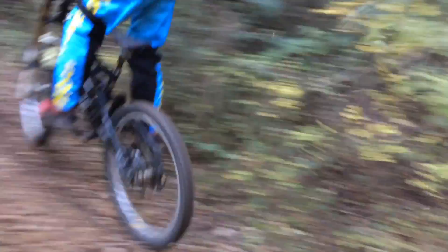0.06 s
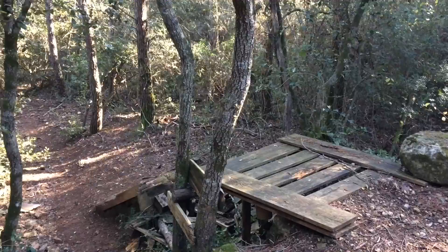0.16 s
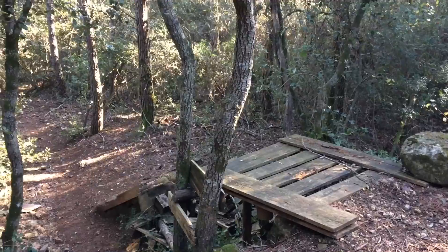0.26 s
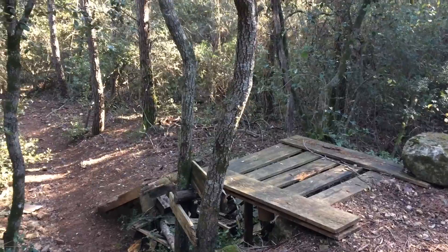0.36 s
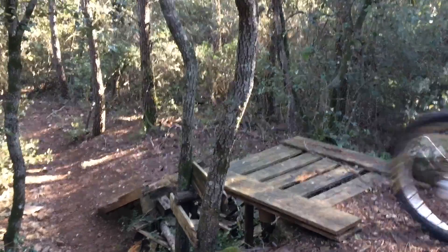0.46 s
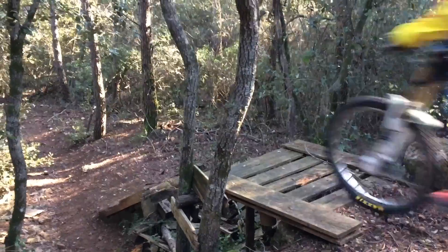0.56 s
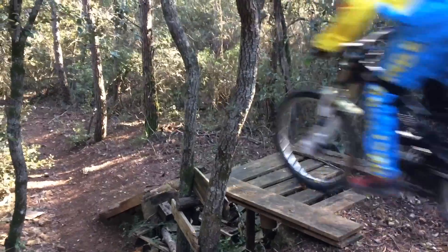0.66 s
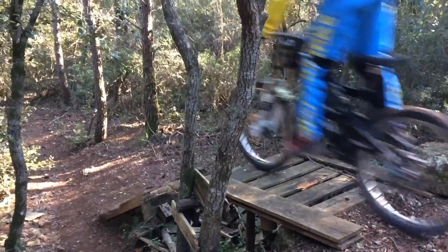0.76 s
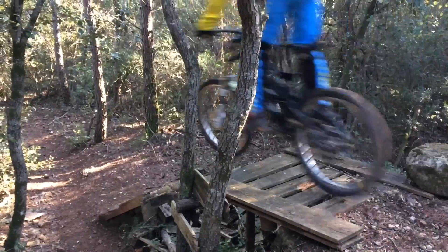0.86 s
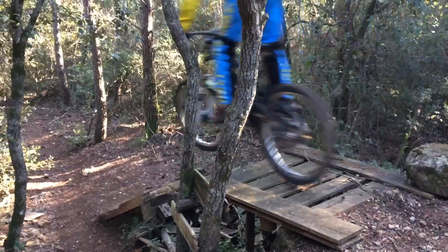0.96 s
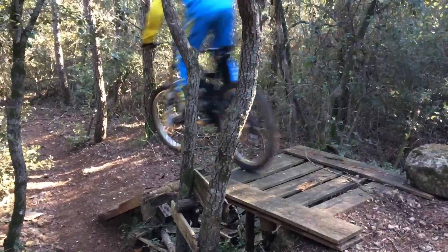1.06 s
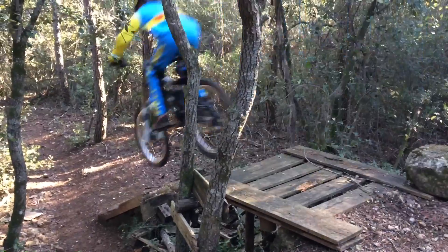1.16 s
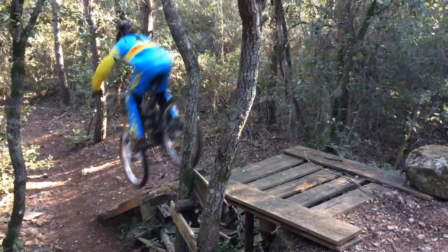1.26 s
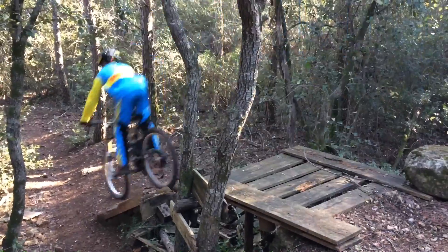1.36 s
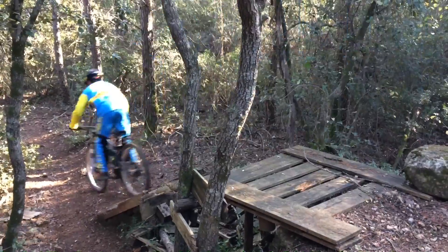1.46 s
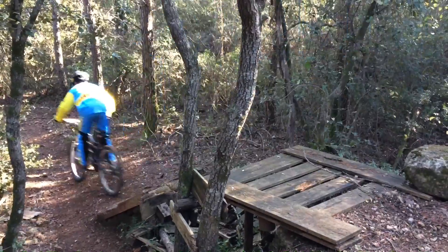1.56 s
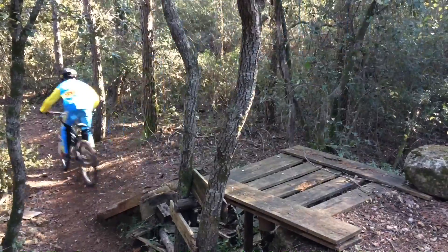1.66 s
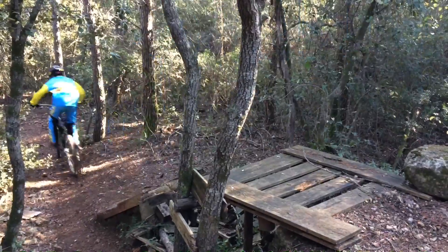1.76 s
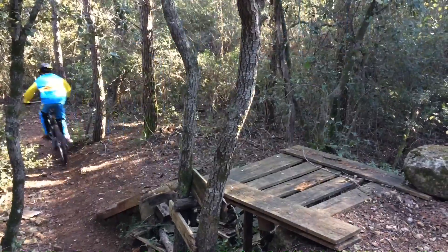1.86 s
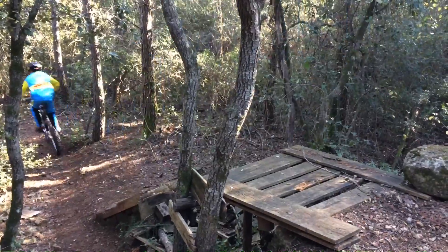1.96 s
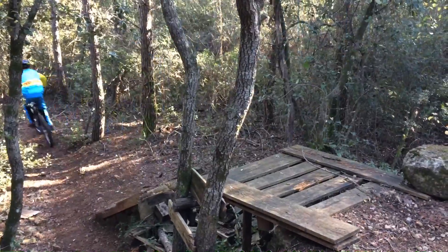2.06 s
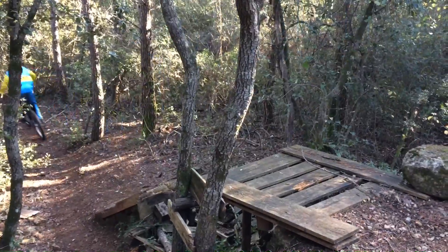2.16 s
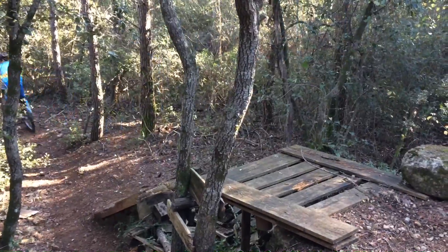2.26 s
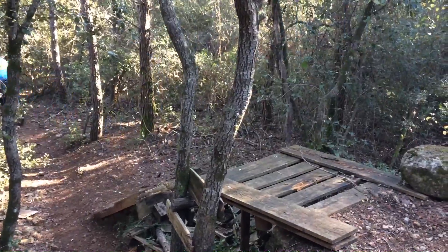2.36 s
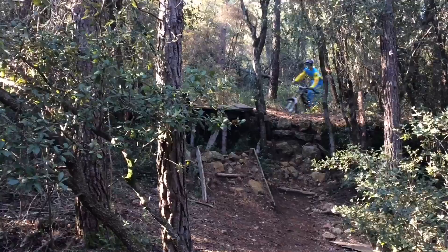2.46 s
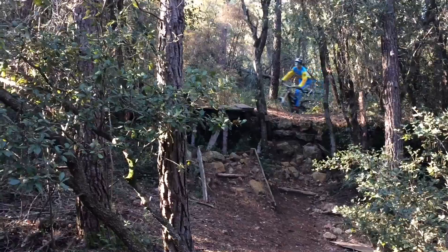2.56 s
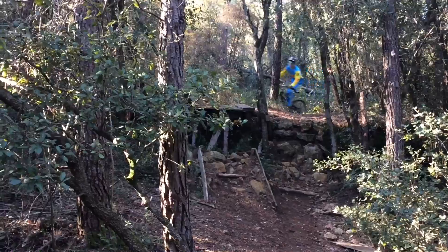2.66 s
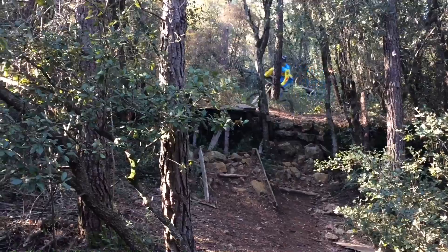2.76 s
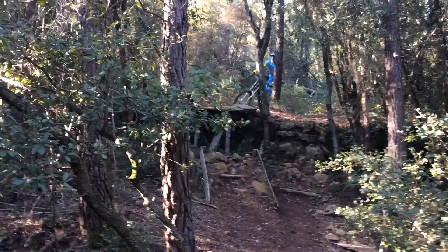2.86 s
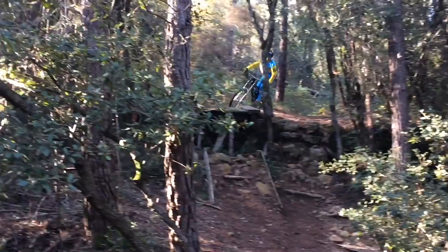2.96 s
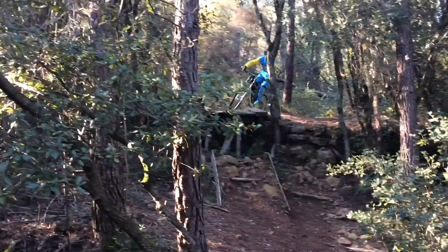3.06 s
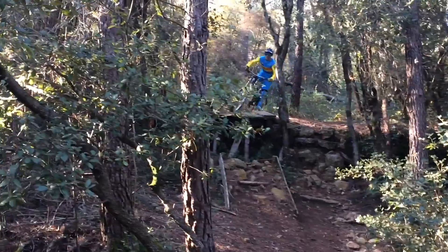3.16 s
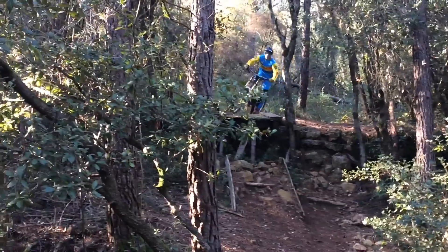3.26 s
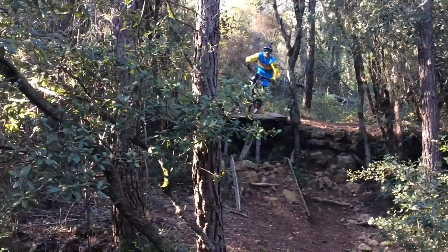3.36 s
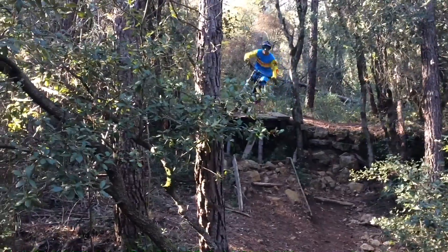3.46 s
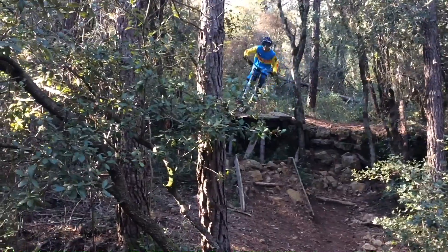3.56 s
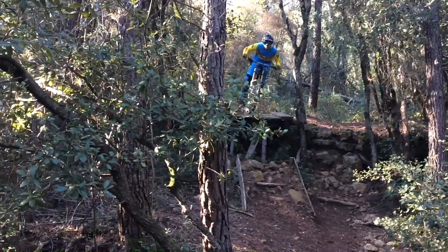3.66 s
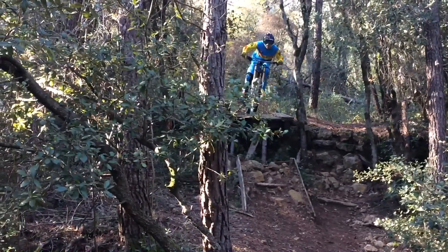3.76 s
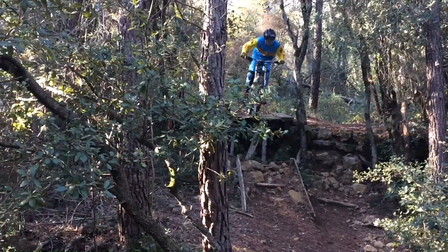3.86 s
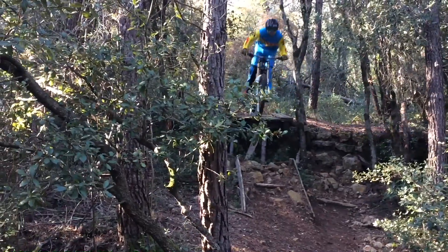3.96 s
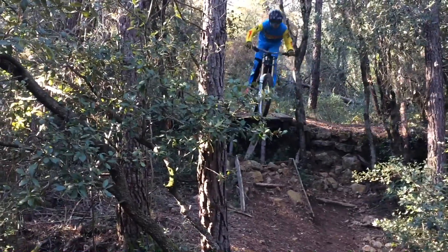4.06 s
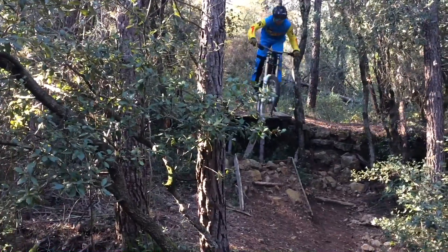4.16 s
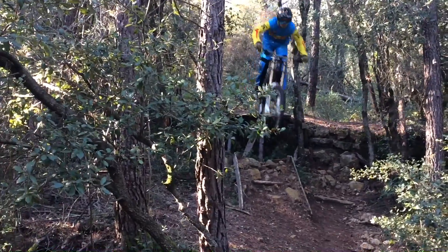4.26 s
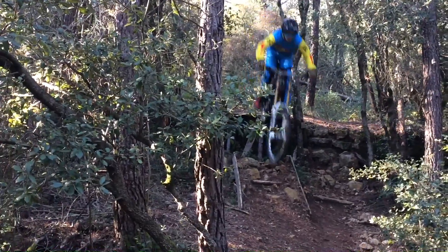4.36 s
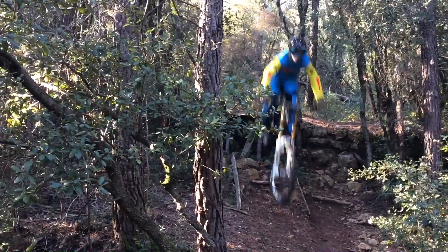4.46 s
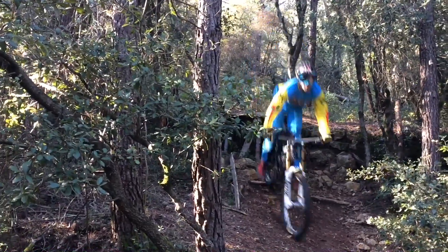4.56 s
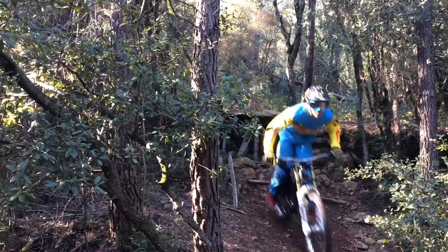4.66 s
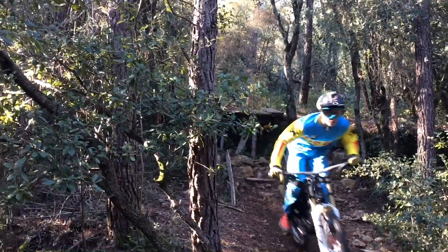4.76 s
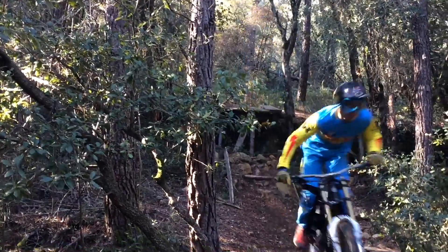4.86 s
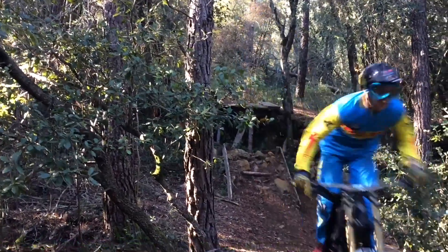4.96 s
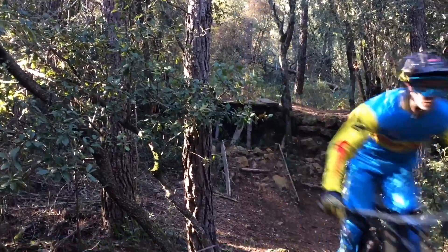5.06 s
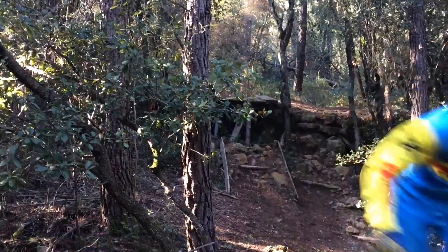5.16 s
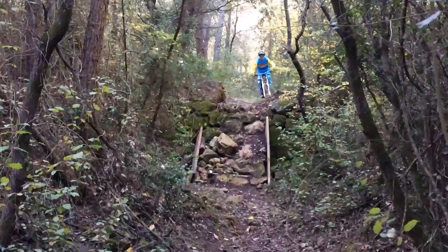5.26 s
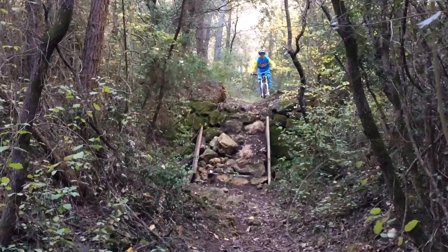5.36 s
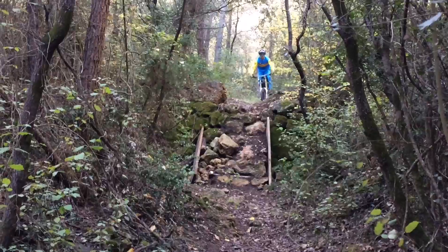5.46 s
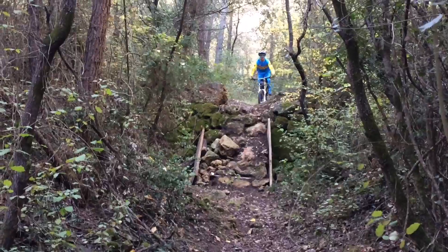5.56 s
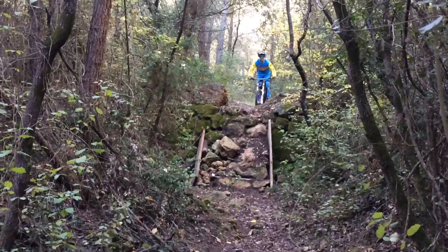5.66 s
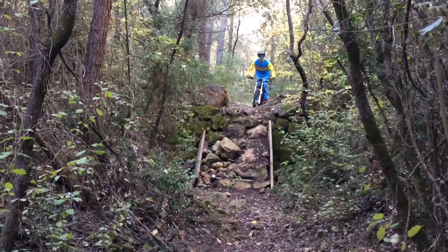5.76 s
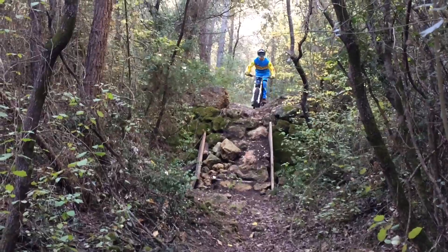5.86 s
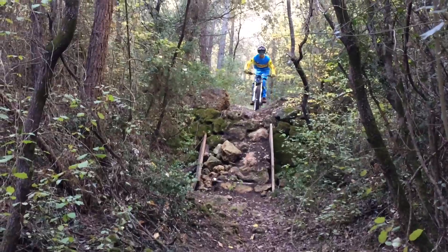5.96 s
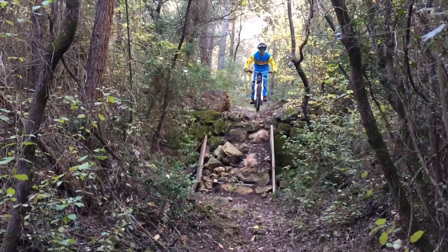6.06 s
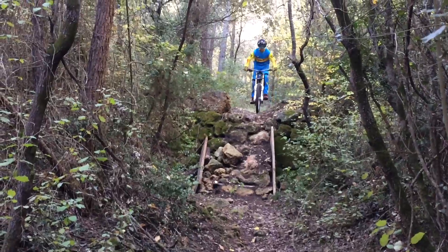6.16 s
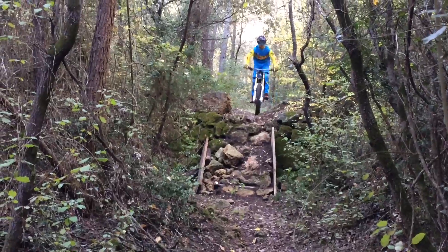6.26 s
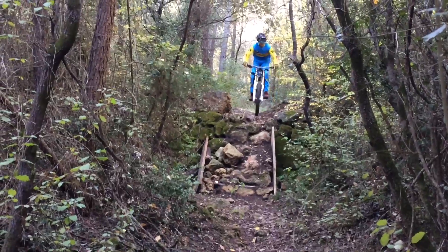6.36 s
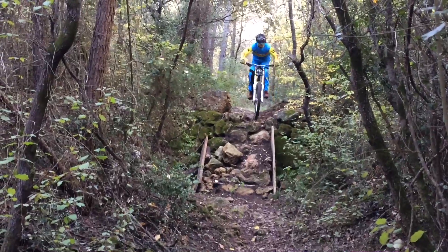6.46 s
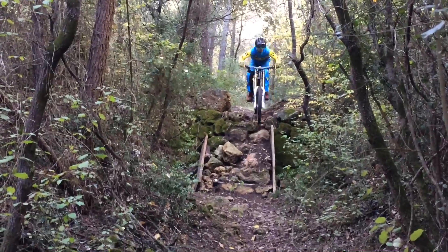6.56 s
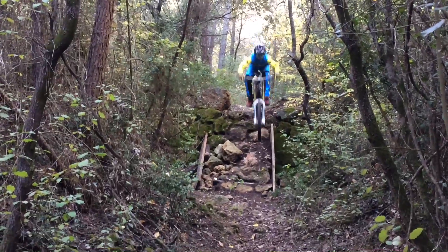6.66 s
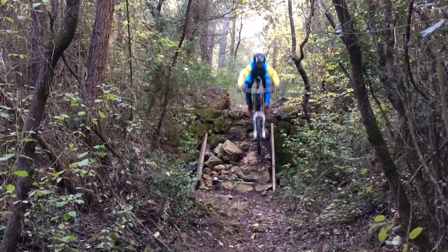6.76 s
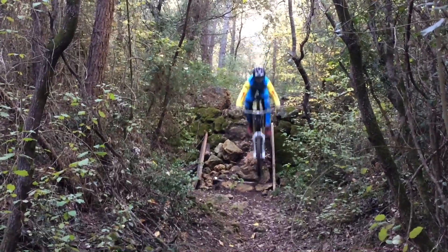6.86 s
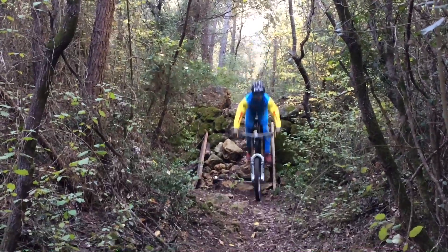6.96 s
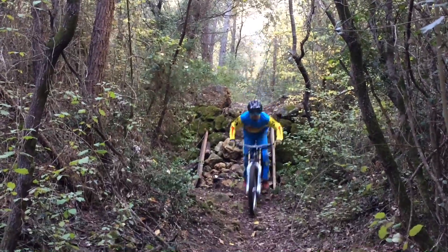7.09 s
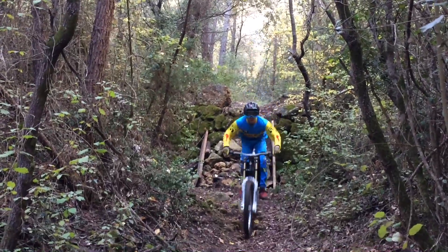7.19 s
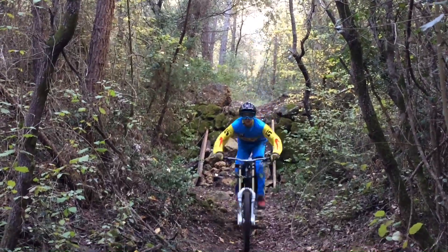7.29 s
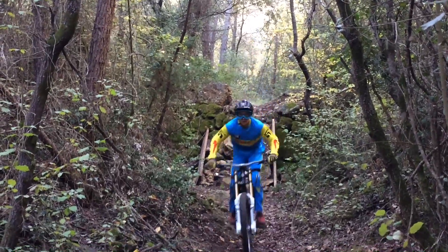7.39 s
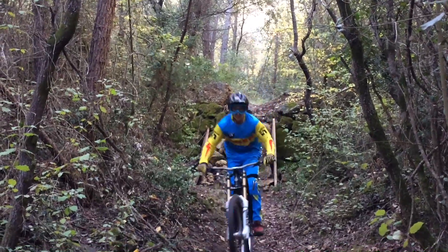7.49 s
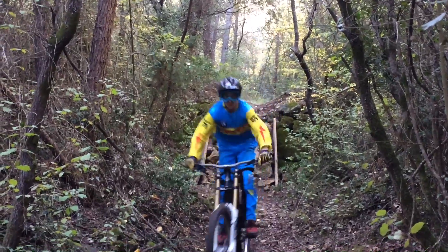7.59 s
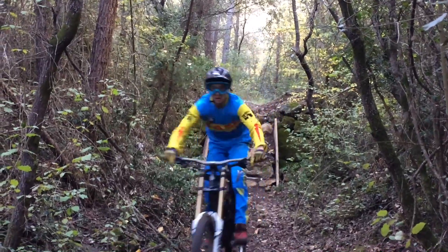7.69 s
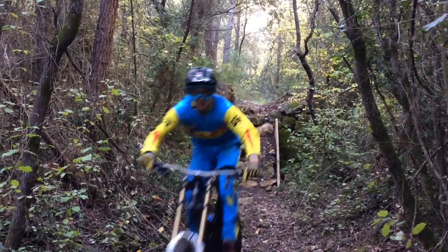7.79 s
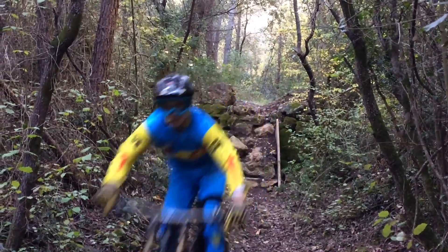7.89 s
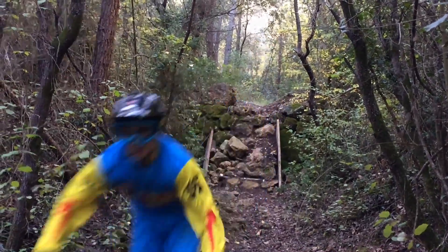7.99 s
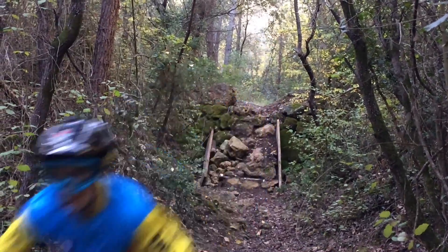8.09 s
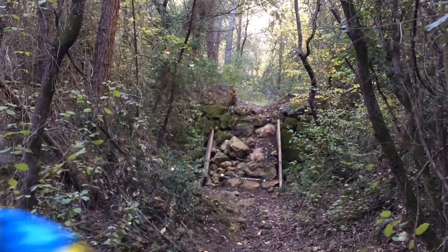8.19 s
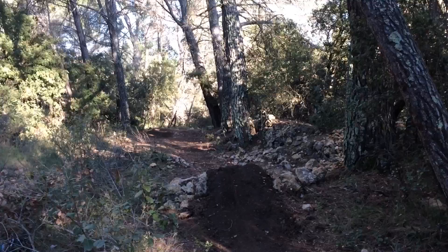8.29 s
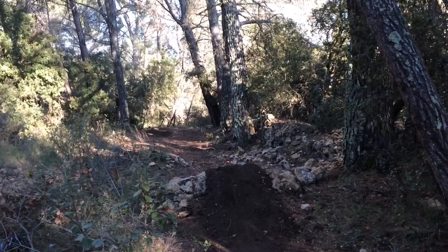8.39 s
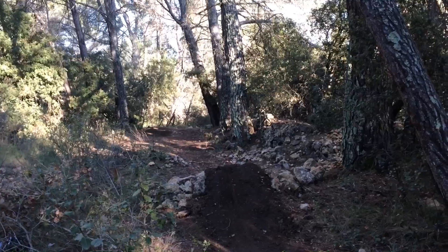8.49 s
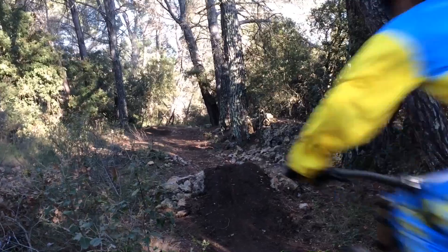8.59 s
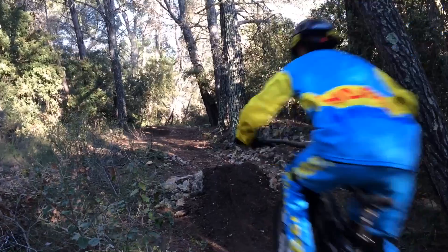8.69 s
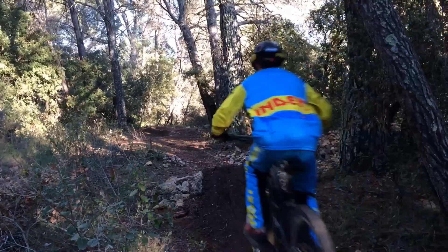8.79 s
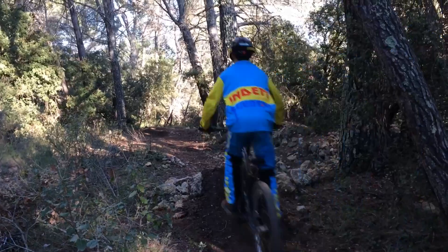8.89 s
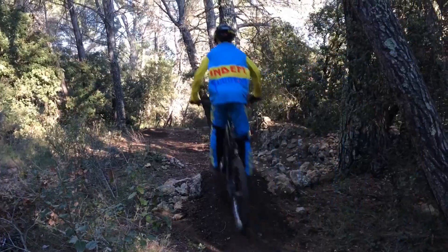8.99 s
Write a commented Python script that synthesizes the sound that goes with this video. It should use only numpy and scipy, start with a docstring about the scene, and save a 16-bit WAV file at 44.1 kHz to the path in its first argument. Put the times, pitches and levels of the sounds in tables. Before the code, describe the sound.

Mono, outdoors in woodland, a stationary microphone with short tree echoes and five passages joined by quick dips. 0-0.18 s: loud tyre rumble and gritty spray, dropping fast. 0.2-2.5 s: quiet hiss, then a fast metallic freewheel buzz from 0.4; thud, knocks and chain slap at 0.7; rolling thins to near quiet by 1.4, then a hard double landing with sharp crack around 1.45-1.55, fading with small knocks. 2.5-5.35 s: very faint distant rolling and ticks, soft thuds and tiny brake squeak near 4.0, heavy landing at 4.63, crunch swelling to a violent chain crack at 5.29. 5.4-8.37 s: faint again, light ticks, thin high whistle; landing around 7.04, then crunching closer, loudest at 8.05-8.3 with thumps and rattles. 8.4-9.0 s: deep dirt crunch peaking at 8.7, knocks, brief hub buzz at 8.8.

```python
"""Mountain-bike tyres rumble, crunch dirt, skid and spray grit on a forest trail, in five passages joined by fades.
Tyres are grainy noise; stones, knocks and chain slaps are short noise bursts in resonances.
The hub ratchet buzzes as pawl clicks ringing the shell; thuds are sagging sines over noise.
Brake squeaks and a thin far whistle are gliding narrow noise; trunks echo the sharp sounds."""
import sys
import numpy as np
from scipy import signal
from scipy.io import wavfile
from scipy.ndimage import uniform_filter1d

SR = 44100
rng = np.random.default_rng(int(sys.argv[2]) if len(sys.argv) > 2 else 0)


def transcribe(signal):
    """Save signal, clipped to [-1, 1], as a 16-bit WAV file at the path in sys.argv[1]."""
    frames = np.atleast_2d(signal).T
    limited = np.clip(frames, -1, 1)
    pcm = np.round(limited * 32767).astype(np.int16)
    wavfile.write(sys.argv[1], SR, pcm)


N = 398223


def gain_of(db):
    """Decibels to gain."""
    return 10 ** (np.asarray(db) / 20)


def evened(x):
    """Scales to rms 1."""
    return x / np.sqrt(np.mean(x ** 2) + 1e-20)


def add(mix, start_s, sound):
    """Mixes a sound in at start_s."""
    part = mix[round(start_s * SR):][:len(sound)]
    part += sound[:len(part)]


def along(rows, time_s):
    """Interpolates the columns of a curve at the given times."""
    at_s, *columns = np.transpose(rows)
    return [np.interp(time_s, at_s, column) for column in columns]


def resonate(x, hz, width_hz):
    """One-pole resonance of gain 1, built by shifting hz to zero and back; hz may be a curve."""
    turn = np.exp(2j * np.pi * np.cumsum(hz * np.ones(len(x))) / SR)
    pole = np.exp(-np.pi * max(width_hz, 5) / SR)
    smooth = signal.lfilter([1 - pole], [1, -pole], x / turn + 1e-18)
    return 2 * (turn * smooth).real


def resonate_twice(x, hz, width_hz, second_width_hz):
    """Two resonances in series at one pitch: steeper skirts."""
    return resonate(resonate(x, hz, width_hz), hz, second_width_hz)


def texture(spectrum, per_s, spread_db, share, patchy_db, grain_s, tilt_db_per_oct=0, count=4):
    """Hiss plus a share of soft grains of uneven size, one train per band, with drifting patches."""
    table_hz, table_db = np.transpose(spectrum)
    hz = np.fft.rfftfreq(4096, 1 / SR)
    colour = gain_of(np.interp(np.log(hz + 1), np.log(table_hz), table_db, -90, -90))
    place = np.interp(np.log(hz + 1), np.log(table_hz[[1, -2]]), [0, count - 1])
    pole = np.exp(-1 / (grain_s * SR))
    share = np.clip(share, 0, 1)
    power_fix = np.sqrt(1 + np.sqrt(share * (1 - share)))
    x = 0
    for k in range(count):
        size = gain_of(spread_db * np.minimum(rng.exponential(1, N), 4))
        hits = size * (rng.random(N) < per_s / SR)
        puffs = signal.lfilter([1], [1, -2 * pole, pole ** 2], hits)
        overlap = np.sqrt(np.clip(1 - abs(place - k), 0, 1))
        band = signal.firwin2(2047, hz, colour * overlap, fs=SR)
        level = np.sqrt(share) * evened(puffs) + np.sqrt(1 - share)
        drive = level * rng.standard_normal(N)
        x = x + signal.oaconvolve(drive / power_fix, band, "same")
    hz, t, z = signal.stft(evened(x), SR, nperseg=256)
    patches = uniform_filter1d(rng.standard_normal(z.shape), 6, axis=0)
    patches = uniform_filter1d(patches, 12, axis=1)
    frames = np.minimum((t * SR).astype(int), N - 1)
    tilt_db = (tilt_db_per_oct * np.ones(N))[frames] * np.log2((hz[:, None] + 1) / 7000)
    return signal.istft(z * gain_of(patchy_db * evened(patches) + tilt_db), nperseg=256)[1][:N]


# Rolling levels, one list a passage, steep where wheels land:
# (time [s], dirt crunch [dB], tyre rumble [dB], grit spray and forest hiss [dB])
ROLLING_LEVELS = [
    [(0.0, -36, -37.5, -34), (0.094, -43, -53, -38.5), (0.15, -42.5, -49, -40)],
    [(0.2, -48, -55.5, -51), (0.432, -47.5, -50, -50), (0.56, -51, -57, -41.5), (0.67, -43.5, -56, -45),
     (0.69, -40.5, -31.5, -53), (0.808, -40, -40, -39.5), (1.096, -60.5, -55.5, -52.5),
     (1.41, -64.5, -66, -52.5), (1.43, -53, -37, -46), (1.455, -42, -33.5, -34), (1.598, -45.5, -44, -44),
     (1.64, -51, -61, -48), (2.016, -54.5, -53, -54.5), (2.3, -53.5, -59.5, -55), (2.49, -57.5, -57, -60.5)],
    [(2.53, -64, -70, -69.5), (2.886, -66, -65, -67), (3.192, -66.5, -73, -74.5),
     (3.646, -59.5, -66, -67.5), (3.88, -63.5, -68, -71), (3.91, -53.5, -45, -65),
     (4.17, -59.5, -54, -59.5), (4.27, -63, -66, -61), (4.3, -58.5, -56, -63.5), (4.51, -69.5, -76, -61.5),
     (4.59, -65.5, -61, -59), (4.63, -42, -34.5, -42), (4.78, -41, -49, -43.5), (4.925, -49, -51, -46),
     (4.945, -47.5, -57, -39), (5.156, -45.5, -48.5, -40.5), (5.205, -41, -40.5, -46),
     (5.229, -36.5, -43, -40), (5.28, -37.5, -39, -32), (5.31, -29.5, -38.5, -33), (5.345, -50, -44, -59)],
    [(5.38, -66, -74, -70), (5.59, -65.5, -63.5, -64.5), (5.95, -65.5, -62.5, -67.5),
     (6.2, -64, -67.5, -64.5), (6.794, -59.5, -62, -59.5), (6.92, -71, -78, -60.5), (6.94, -52, -50, -57),
     (7.02, -62, -60, -62), (7.04, -42, -54, -49), (7.19, -39.5, -39.5, -48.5), (7.264, -47, -48, -49.5),
     (7.618, -42.5, -36.5, -49), (7.838, -53.5, -65, -50), (8.01, -50, -46, -45.5),
     (8.03, -35.5, -32.5, -37), (8.178, -27.5, -29, -34), (8.25, -31.5, -37, -39.5),
     (8.35, -38, -39, -39.5)],
    [(8.41, -35.5, -41, -56), (8.486, -36.5, -33, -50.5), (8.706, -28.5, -30.5, -42),
     (8.772, -37, -40.5, -43), (8.93, -39.5, -38.5, -44.5), (9.03, -34, -45, -44)],
]
# Spray tilt, dull for close grit, bright for forest hiss: (time [s], tilt [dB/octave])
SPRAY_TILT = [(0.0, 0.5), (0.6, 0.5), (1.4, 1), (1.45, -5.5), (1.65, -0.5), (2.3, 1), (3.2, -2.5),
              (3.7, -0.5), (3.9, -2.5), (4.55, 2), (4.62, -5.5), (5.2, -.5), (6.9, -2), (7.05, -5.5),
              (7.6, 0), (8.2, -3.5), (8.5, -8), (9.03, 4)]
# Layer spectra: (frequency [Hz], relative density [dB])
RUMBLE_SPECTRUM = [(15, -42), (25, -5.5), (59, 16.5), (81, 8.5), (172, 1), (248, -12.5), (500, -21.5),
                   (650, -31), (1100, -120)]
CRUNCH_SPECTRUM = [(88, -32), (150, 1), (254, -5.5), (300, -7.5), (340, -8), (373, -5.5), (1620, -9),
                   (3190, -16), (6000, -28), (7800, -49), (13200, -120)]
SPRAY_SPECTRUM = [(1470, -14.5), (2500, -1), (2640, -2), (3650, -5), (4680, -4), (8310, -3), (9450, -3.5),
                  (14300, -0.5), (15200, -3)]
UNEVEN_DB, UNEVEN_S = 2, 0.049  # looser and firmer ground


def uneven_ground():
    """Slow random curve of rms 1."""
    slow = uniform_filter1d(rng.standard_normal(N), round(UNEVEN_S * SR))
    return evened(uniform_filter1d(slow, 1000))


def tyres():
    """Knobbed tyres on loose ground in three layers; louder crunch is grainier, as single stones stand out."""
    t = np.arange(N) / SR
    crunch_db, rumble_db, spray_db = along(np.vstack(ROLLING_LEVELS), t)
    tilt, = along(SPRAY_TILT, t)
    a, b = uneven_ground(), uneven_ground()
    crunch_db = crunch_db + UNEVEN_DB * a
    spray_db = spray_db + 0.37 * UNEVEN_DB * (0.86 * a + 0.59 * b)
    near = np.clip((crunch_db + 67.0) / 25, .15, 1)
    crunch = texture(CRUNCH_SPECTRUM, per_s=120, spread_db=3.5, share=0.47 * near,
                     patchy_db=2.2, grain_s=0.0019)
    rumble = texture(RUMBLE_SPECTRUM, per_s=40, spread_db=-1.0, share=0.17,
                     patchy_db=-2.2, grain_s=0.0068, count=2)
    spray = texture(SPRAY_SPECTRUM, per_s=550, spread_db=6.0, share=0.22 * near,
                    patchy_db=2.0, grain_s=0.00056, tilt_db_per_oct=tilt, count=2)
    return gain_of(crunch_db) * crunch + gain_of(rumble_db) * rumble + gain_of(spray_db) * spray


STONES_OVER_CRUNCH_DB, STONES_SPREAD_DB = 8.5, 1  # most over the crunch; spread downward
STONES_LOW_HZ, STONES_HIGH_HZ = 400, 2480
STONES_T60_S, STONES_HARDNESS = 0.028, .3


def stones(count=90):
    """Rows for knock(): small stones struck at random moments, a little over the crunch level."""
    at_s, size, pitch = rng.random((count, 3)).T
    at_s = at_s * N / SR
    crunch_db = along(np.vstack(ROLLING_LEVELS), at_s)[0]
    db = crunch_db + STONES_OVER_CRUNCH_DB + STONES_SPREAD_DB * np.log(1 - .95 * size)
    hz = STONES_LOW_HZ * (STONES_HIGH_HZ / STONES_LOW_HZ) ** pitch
    return [(*row, STONES_T60_S, STONES_HARDNESS) for row in zip(at_s, db, hz)]


# Frame and stone knocks: (time [s], peak level [dB], centre [Hz], burst t60 [s], hardness [0-1])
KNOCK_EVENTS = [(.202, -32.5, 2260, .034, 0.1), (0.475, -24.5, 1020, 0.018, 1), (.672, -29, 2570, .032, .4),
                (.688, -21, 1010, 0.023, 0.3), (.726, -26, 2900, 0.048, 0.4),
                (1.033, -35.5, 1240, 0.033, 0.4), (1.116, -30, 1000, 0.052, 0.8),
                (1.145, -27.5, 440, 0.079, 0.96), (1.423, -23, 398, 0.06, 0.95),
                (1.454, -12, 417, 0.087, 0.94), (1.544, -9, 960, 0.014, .8), (1.802, -41, 2910, .03, 0.3),
                (1.844, -36, 940, 0.029, 0.8), (2.009, -40, 513, 0.026, 0.1),
                (2.029, -30, 1140, .031, 0.03), (2.18, -34, 1230, 0.07, 0.6), (2.287, -32, 960, 0.05, .5),
                (3.578, -47.5, 991, 0.069, .5), (3.633, -46, 1180, .03, 0.3), (3.691, -54, 1160, .022, 0.2),
                (3.828, -38.5, 1100, 0.069, 0.04), (3.997, -30, 704, 0.063, 0.24),
                (4.603, -23, 550, .076, 1), (4.64, -23, 2370, 0.053, .5), (4.701, -19.5, 710, 0.091, 0.84),
                (4.788, -24, 1980, .11, 0.33), (5.077, -22, 690, 0.031, 0.42),
                (5.232, -17, 566, 0.035, 0.8), (5.77, -44.5, 958, .03, 0.24), (5.898, -48, 840, 0.026, 0.4),
                (6.152, -41.5, 2430, .036, 0.3), (6.277, -44.5, 748, .03, 0.7),
                (6.325, -45, 2600, 0.027, 0.1), (6.426, -45.5, 980, .025, 0.7),
                (6.552, -46, 1040, 0.027, .5), (6.582, -42, 2080, 0.062, 0.3), (6.612, -41, 784, .03, 0.6),
                (6.736, -43, 2060, .042, .6), (6.825, -44.5, 1570, 0.035, .5), (6.936, -33, 560, .04, .5),
                (7.036, -26.5, 1240, 0.1, 0.57), (7.161, -28, 516, 0.12, 0.75),
                (7.279, -27.5, 611, 0.033, 0.18), (7.461, -27, 970, 0.037, 0.13),
                (7.552, -28.5, 600, 0.059, 0.76), (7.591, -27, 970, 0.022, 0.03),
                (7.797, -22, 2280, 0.046, 0.46), (7.93, -33, 404, 0.077, .6),
                (7.961, -23.5, 1420, 0.11, 0.67), (8.026, -20.5, 720, 0.041, .45),
                (8.037, -13.5, 990, 0.014, 0.22), (8.089, -12.5, 480, 0.091, 0.32),
                (8.134, -15, 885, .04, 0.33), (8.2, -17.5, 750, 0.06, 0.2), (8.273, -19.5, 1860, 0.069, .5),
                (8.312, -23.5, 2350, 0.13, 0), (8.408, -32, 960, 0.037, .6), (8.448, -30, 476, 0.047, 0.3),
                (8.487, -25, 888, .034, 0.7), (8.516, -21, 1380, .037, .5),
                (8.619, -14.5, 385, 0.025, 0.94), (8.664, -15.5, 1720, .015, 0.1),
                (8.682, -22.5, 1650, .056, 0), (8.824, -25, 1390, 0.06, 0.26), (8.896, -21, 514, .04, .9),
                (8.955, -25, 980, 0.078, 0.7)]


def knock(peak_db, hz, t60_s, hardness):
    """Dull blow on frame, wood or stone: dry click and decaying noise in one broad resonance."""
    t = np.arange(6000) / SR
    decay = gain_of(-60 * t / max(t60_s, .008))
    click = 3 * hardness * np.exp(-t / 0.00093)
    burst = rng.standard_normal(len(t)) * (decay + click)
    burst *= np.minimum(t / 0.00028, 1)
    body = resonate_twice(burst, hz, 0.31 * hz, 0.92 * hz)
    wide = resonate(resonate(burst, 1.89 * hz, 2000), 1.34 * hz, 3300)
    out = evened(body) + 1.84 * hardness * evened(wide)
    return gain_of(peak_db) * out / abs(out).max()


def forest(x, t60_s=0.24):
    """Scattered trunk echoes: sparse taps of random sign, dying away, treble softened."""
    taps = np.zeros(SR // 2)
    at = np.arange(60, len(taps) - 20, 20)
    at = at + rng.integers(0, 20, len(at))
    taps[at] = rng.choice([-1., 1.], len(at)) * gain_of(-60 * at / SR / t60_s)
    taps = signal.lfilter([1], [1, -.4], taps)
    return signal.oaconvolve(x, taps / np.linalg.norm(taps))[:N]


# Tyre thuds: (time [s], level [dB], settled pitch [Hz])
THUD_EVENTS = [(.202, -35, 78), (0.687, -19, 141), (0.771, -31, 97), (.933, -24.5, 74.6), (1.105, -36, 129),
               (1.424, -24, 151), (1.448, -15.5, 180.5), (1.478, -22.5, 200), (3.899, -31, 72),
               (3.958, -35, 110), (3.999, -32, 120), (4.12, -31.5, 101), (4.29, -42, 110),
               (4.647, -18.5, 135), (5.069, -32.5, 156), (5.224, -18.5, 188), (6.928, -35.5, 61),
               (7.027, -33, 67), (7.74, -30.5, 198), (7.928, -28.5, 70), (8.046, -22, 100),
               (8.107, -17.5, 126), (8.168, -19, 90), (8.27, -12, 88), (8.44, -28, 87)]
THUD_T60_S = 0.094


def thud(db, hz, t60_s):
    """Squeezed tyre casing swings a few times, sagging in pitch, over crushed soil."""
    t = np.arange(12000) / SR
    sagging_s = t + 0.0025 * (1 - np.exp(-t / 0.0049))
    swing = np.sin(2 * np.pi * hz * sagging_s) * rng.choice([-1, 1])
    soil = evened(resonate(rng.standard_normal(len(t)), 260, 530))
    envelope = gain_of(db - 60 * t / max(t60_s, .02)) * np.minimum(t / 0.0053, 1)
    return envelope * (0.82 * swing + 0.18 * soil)


# Chain slaps: (time [s], peak level [dB], strongest frequency [Hz], burst t60 [s])
SLAP_EVENTS = [(0.3868, -30.5, 4750, 0.021), (.6041, -31, 5970, .04), (.6528, -30, 11700, .04),
               (.673, -25, 5800, .031), (0.712, -26, 9970, 0.023), (0.727, -15.5, 4780, .024),
               (0.8798, -31, 6040, 0.039), (1.423, -29, 3150, 0.028), (1.453, -9.5, 3800, 0.017),
               (1.5456, -18, 3340, 0.015), (1.5885, -26, 7680, 0.029), (2.0921, -43, 4330, .03),
               (2.288, -30.5, 3040, 0.083), (2.901, -43, 3600, 0.021), (2.9207, -49, 4220, .027),
               (3.165, -55, 6000, .03), (3.2859, -53, 5100, .036), (3.313, -60, 10000, .03),
               (3.454, -51, 10500, .03), (3.474, -49, 5000, .027), (3.5783, -49.5, 4130, .027),
               (3.9314, -30, 5260, 0.092), (4.197, -37.5, 4400, .032), (4.6395, -12, 4800, 0.061),
               (4.6969, -19, 3350, 0.062), (4.731, -20, 4380, 0.044), (4.784, -23, 3000, .032),
               (5.0302, -23, 12900, 0.28), (5.2338, -18.5, 6300, 0.074), (5.2637, -21, 3470, .088),
               (5.288, -1, 3970, 0.015), (5.376, -46, 3870, .028), (5.5065, -36.5, 4930, .04),
               (5.632, -42, 4780, 0.026), (5.6572, -28, 4640, .019), (5.8247, -46, 3068, 0.042),
               (6.1514, -47.5, 3540, .03), (6.341, -44, 4730, .033), (6.6054, -47, 4800, .033),
               (6.6777, -46, 4500, .03), (6.8538, -38.5, 3860, .03), (6.954, -26, 3570, 0.075),
               (6.975, -36, 11000, .03), (7.0542, -16, 4470, 0.019), (7.065, -18.5, 11500, 0.053),
               (7.375, -28.5, 5670, .04), (7.5495, -26, 4370, 0.086), (7.7966, -21, 5970, .014),
               (7.838, -26.5, 3870, 0.043), (7.9364, -26.5, 3800, 0.036), (7.984, -24, 4250, 0.058),
               (8.0004, -19.5, 3960, .04), (8.0601, -5.5, 5560, 0.037), (8.064, -6.5, 5560, 0.033),
               (8.268, -19.5, 3560, 0.14), (8.322, -19, 3630, 0.11), (8.404, -29.5, 3020, .04),
               (8.509, -30, 3160, 0.027), (8.542, -29, 4640, 0.026), (8.6556, -28, 5390, .047),
               (8.6808, -21, 4140, .044)]
# Chain modes: (frequency [Hz], level [dB], ring time [s]); width is 1.3 / time + 350 Hz
CHAIN_MODES = [(3360, -8.5, 0.015), (4070, -3.5, 0.013), (6200, -1, 0.1), (7430, -33, 0.12),
               (7560, -9, 0.061), (9900, -42, 0.052), (10760, -6, 0.066)]
SLAP_RISE_S = 1.32 * 0.00082


def slap(peak_db, hz, rise_s, t60_s):
    """Links rattle on metal: a noise burst in chain modes, detuned each time, strongest near hz."""
    t = np.arange(6000) / SR
    noise = rng.standard_normal(len(t))
    rise = np.minimum(t / max(rise_s, .0002), 1) ** 2
    burst = noise * gain_of(-60 * t / max(t60_s, .008)) * rise
    ring = 0
    for mode_hz, mode_db, ring_s in CHAIN_MODES:
        tuned_hz = mode_hz * (1 + 0.07 * rng.standard_normal())
        mode = resonate(resonate(burst, tuned_hz, 1.3 / ring_s + 350), mode_hz, 2486)
        ring = ring + gain_of(mode_db + 0.77 * rng.standard_normal()) * evened(mode)
    crack = resonate_twice(burst, 7000, 11000, 11000)
    strongest = resonate_twice(burst, hz, 0.28 * hz, 1.9 * hz)
    near = np.clip((peak_db + 56.0) / 35, .1, 1)  # faint far slaps lose ring and broad crack
    out = near * (0.78 * evened(ring) + 0.99 * evened(crack)) + 1.26 * evened(strongest)
    return gain_of(peak_db) * out / abs(out).max()


# Coasting, one list a stretch: (time [s], ratchet level [dB], lift of lower hub modes [dB])
COASTING_LEVELS = [
    [(.4, -52, 0), (.5, -48, 4), (.66, -41, -1), (.74, -46, -8), (.82, -41, 2), (.93, -42, -1.5),
     (1.05, -50, -1), (1.42, -54.5, -7)],
    [(2.53, -77, -2), (2.85, -70, -5), (3.15, -78, 2)],
    [(3.95, -63, -4), (4.35, -67, -5), (4.6, -59, -5)],
    [(8.7, -71, -8), (8.8, -39.5, -6), (9.03, -53, -5)],
]
# Hub shell modes: (frequency [Hz], width [Hz], level before lift [dB])
HUB_MODES = [(5400, 200, -22.5), (5940, 180, 10.5), (8060, 370, 2), (10340, 430, 9), (11200, 360, 5),
             (12460, 640, 9)]
TEETH_PER_S, SLOWING_PER_S2 = 104, 30
LOWER_MODES_HZ = 7000  # modes below this get the lift


def ratchet(rows):
    """Pawls drop over teeth in short uneven bursts ringing the hub shell; the wheel slows as it coasts."""
    t = np.arange(rows[0][0], rows[-1][0], 1 / SR)
    db, lift_db = along(rows, t)
    per_s = TEETH_PER_S - SLOWING_PER_S2 * (t - t[0])
    wobble = evened(uniform_filter1d(rng.standard_normal(len(t)), 800))
    teeth = np.cumsum(per_s * (1 + 0.14 * wobble)) / SR
    tooth = teeth.astype(int)
    force = gain_of(1.06 * rng.standard_normal(len(t)))[tooth]
    phase = (teeth % 1) / 0.12
    drop = force * phase * np.exp(-phase) * rng.standard_normal(len(t))
    drop = drop + 1.6 * force * np.diff(tooth, prepend=0)  # firm click opens each burst
    ring = 0.82 * evened(np.diff(drop, prepend=0))
    for hz, width_hz, mode_db in HUB_MODES:
        gain = gain_of(mode_db + lift_db * (hz < LOWER_MODES_HZ))
        ring = ring + gain * evened(resonate(drop, hz, width_hz))
    return t[0], gain_of(db) * evened(ring) * signal.windows.tukey(len(t), .05)


# Brief tyre skids on grit: (start [s], length [s], level [dB], strongest frequency [Hz])
SCRAPE_EVENTS = [(.86, 0.046, -42.5, 3000), (1.467, 0.047, -36.5, 8250), (2.193, 0.045, -54, 3040),
                 (6.152, 0.043, -66, 3000), (6.281, 0.17, -68, 2400), (6.568, 0.086, -64.5, 3000),
                 (6.67, .04, -66, 3500), (6.726, 0.031, -64, 2500), (7.19, .05, -45, 2500),
                 (7.28, 0.038, -45, 2400), (7.4, 0.045, -52.5, 4200), (7.69, .07, -48.5, 3480),
                 (7.8, 0.061, -54, 2220), (8.14, 0.043, -35, 3770), (8.31, 0.064, -38, 2540)]


def scrape(start_s, length_s, db, hz):
    """Tyre skid: a soft swell of gritty noise near hz plus a broad hiss around 5.5 kHz."""
    grit = rng.standard_normal(round(length_s * SR))
    body = resonate_twice(grit, hz, 0.33 * hz, 0.56 * hz)
    hiss = resonate_twice(grit, 5500, 5000, 5000)
    sound = evened(body) + 0.8 * evened(hiss)
    return start_s, gain_of(db) * sound * signal.windows.tukey(len(grit), .6)


# Brake squeaks and far whistles: (start [s], length [s], first pitch [Hz], last pitch [Hz],
# first level [dB], last level [dB], width [Hz])
TONE_EVENTS = [(4.045, 0.066, 4060, 4230, -46, -62, 55), (4.14, .06, 4150, 4180, -72, -76, 50),
               (5.48, .06, 7900, 8000, -72, -75, 300), (5.58, .24, 8270, 8200, -76, -75, 250),
               (5.827, 0.089, 3100, 3000, -64, -71, 400), (5.89, .14, 8300, 8140, -67.5, -75, 250),
               (6.102, 0.146, 8350, 8300, -78, -81, 150)]


def tone(start_s, length_s, first_hz, last_hz, first_db, last_db, width_hz):
    """Squeak or whistle: narrow noise plus a sine, gliding evenly in pitch and level."""
    u = np.arange(0, length_s, 1 / SR) / length_s
    hz = first_hz + (last_hz - first_hz) * u
    db = first_db + (last_db - first_db) * u
    fuzz = resonate_twice(rng.standard_normal(len(u)), hz, width_hz, width_hz)
    steady = np.sin(2 * np.pi * np.cumsum(hz) / SR) * (75 / width_hz) ** 2  # narrower is purer
    sound = evened(evened(fuzz) + steady)
    return start_s, gain_of(db) * sound * signal.windows.tukey(len(u), .2)


def scene():
    """Rolling bed, blows, hub and tones; sharp sounds echo within their own passage."""
    sharp, plain = np.zeros(N), np.zeros(N)  # with and without echoes
    for start_s, *row in KNOCK_EVENTS + stones():
        add(sharp, start_s, knock(*row))
    for start_s, *row in THUD_EVENTS:
        add(plain, start_s, thud(*row, THUD_T60_S))
    for start_s, db, hz, t60_s in SLAP_EVENTS:
        add(sharp, start_s, slap(db, hz, SLAP_RISE_S, t60_s))
    for rows in COASTING_LEVELS:
        add(sharp, *ratchet(rows))
    for row in SCRAPE_EVENTS:
        add(sharp, *scrape(*row))
    for row in TONE_EVENTS:
        add(plain, *tone(*row))
    passages = np.split(sharp, [round(join_s * SR) for join_s, *_ in PASSAGE_FADES])
    echoes = np.concatenate([forest(passage)[:len(passage)] for passage in passages])
    return (tyres() + sharp + plain + gain_of(-10.5) * echoes)[None]


# Joins between passages: (time [s], fade out [s], fade in [s])
PASSAGE_FADES = [(.177, 0.033, 0.021), (2.509, 0.027, 0.034), (5.346, 0.029, 0.052), (8.375, 0.03, 0.061)]
BASS_CUT_HZ, TREBLE_LIMIT_HZ = 48, 15400


def record(dry):
    """Microphone: bass cut and a slight capsule ring; then fades at the joins and a treble limit."""
    t, level = np.arange(N) / SR, np.ones(N)
    for join_s, out_s, in_s in PASSAGE_FADES:
        fade = np.maximum((join_s - t) / out_s, (t - join_s) / in_s)
        level *= np.clip(fade, .02, 1)
    bass_cut = signal.butter(2, BASS_CUT_HZ, "high", fs=SR, output="sos")
    thinned = signal.sosfilt(bass_cut, dry)
    thinned = thinned + .5 * resonate(thinned[0], 11060, 520)  # capsule ring
    treble_limit = signal.firwin(511, TREBLE_LIMIT_HZ, window=("kaiser", 9), fs=SR)
    return signal.oaconvolve(thinned * level, treble_limit[None], "same")


dry = scene()
out = record(dry)
transcribe(out)
```